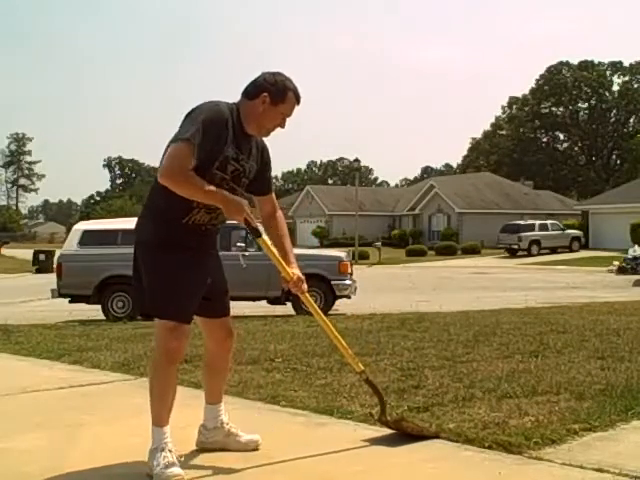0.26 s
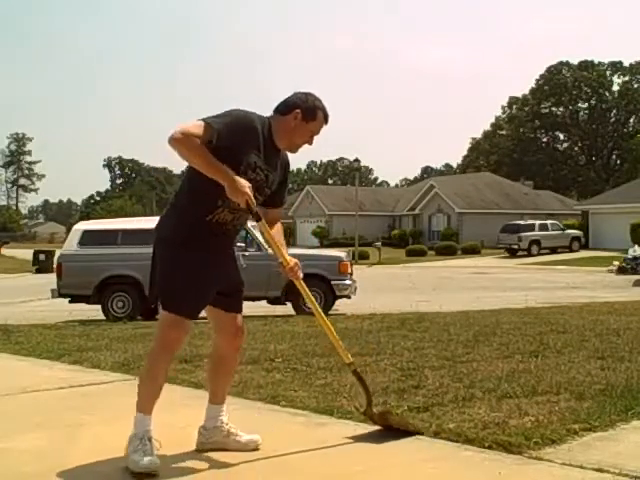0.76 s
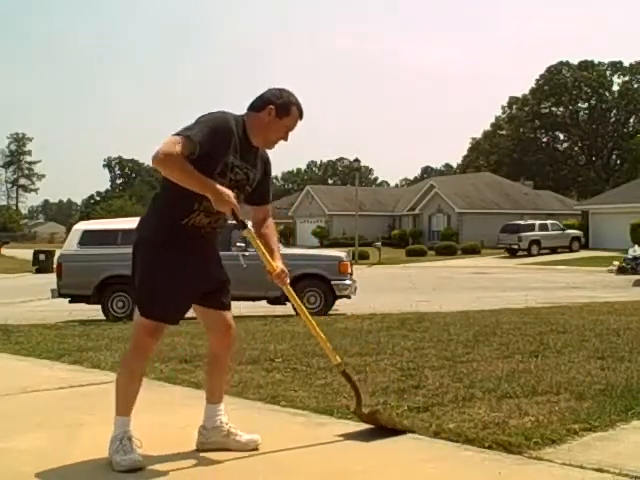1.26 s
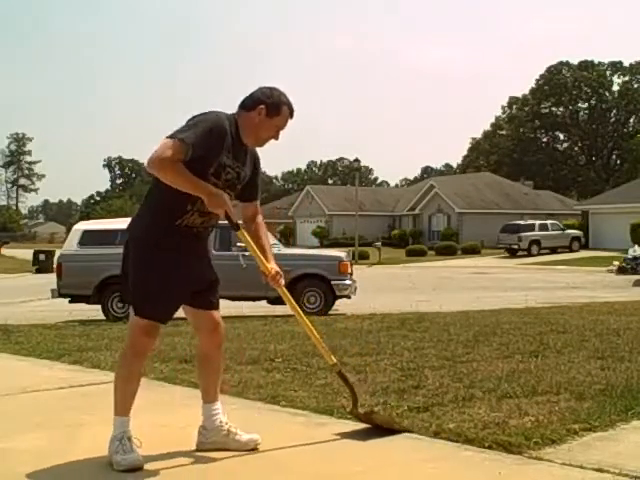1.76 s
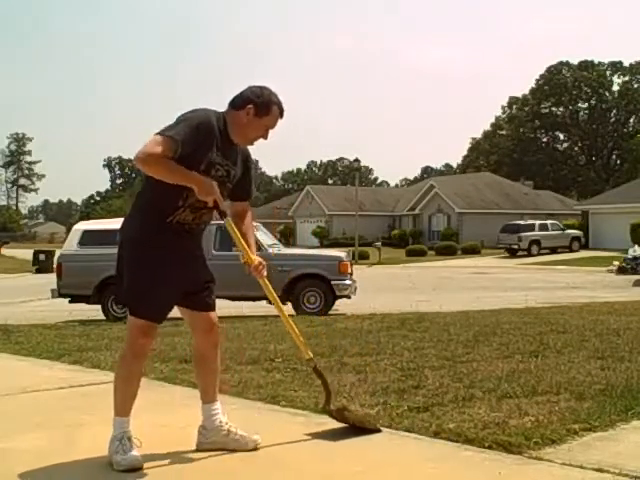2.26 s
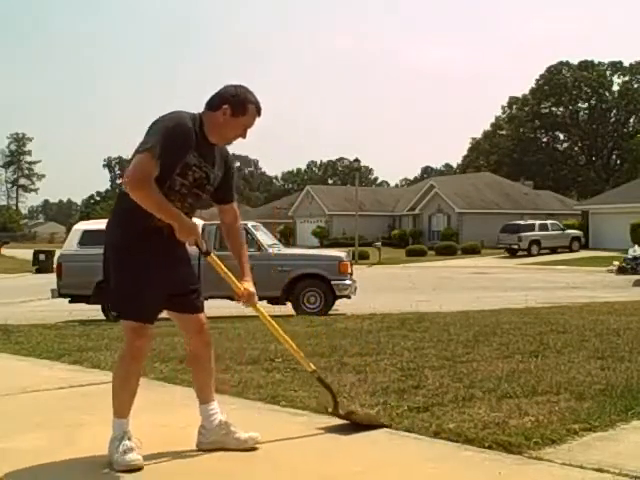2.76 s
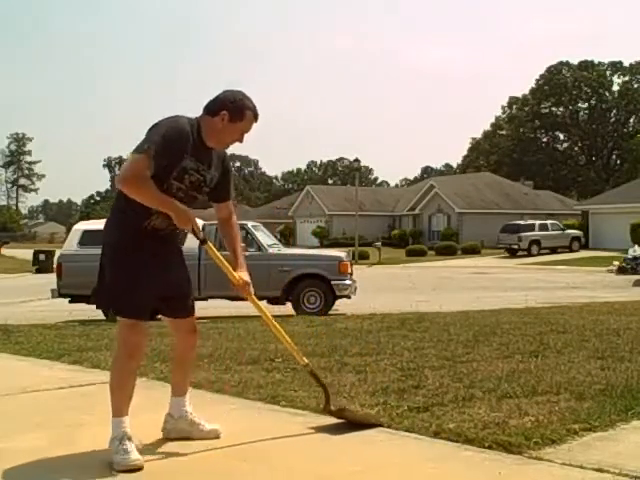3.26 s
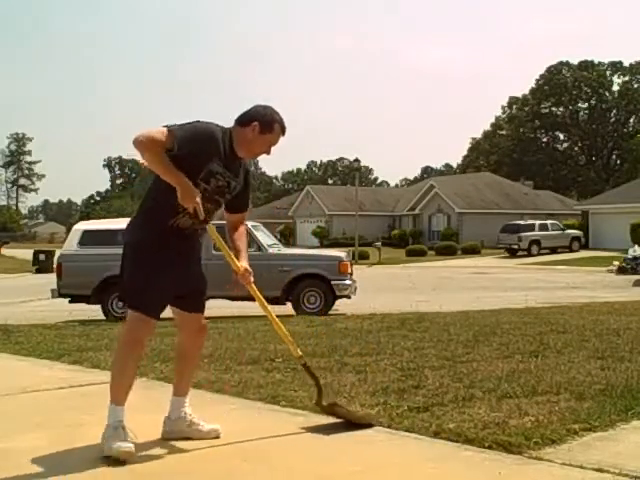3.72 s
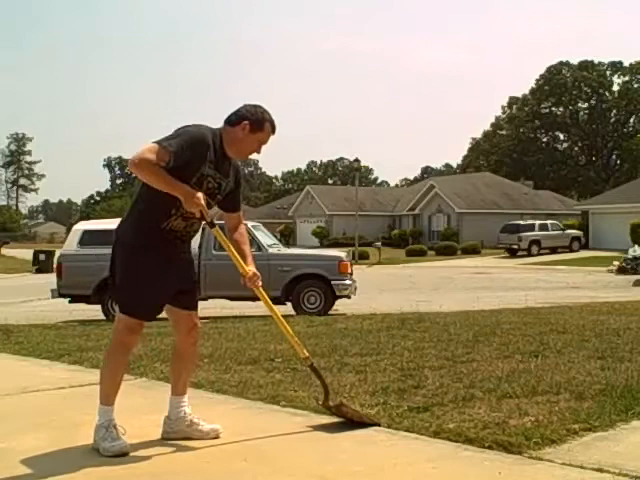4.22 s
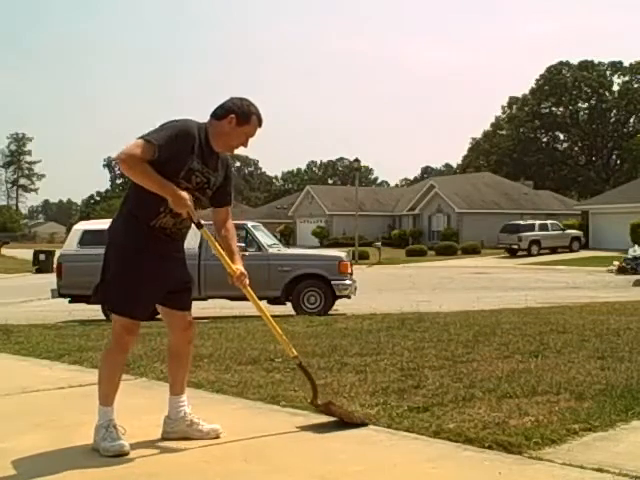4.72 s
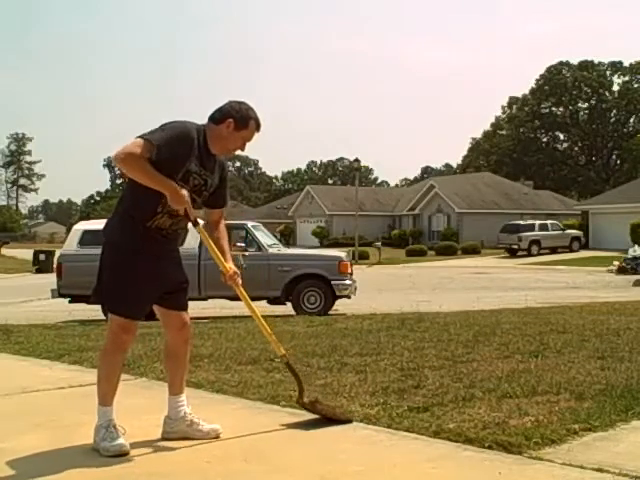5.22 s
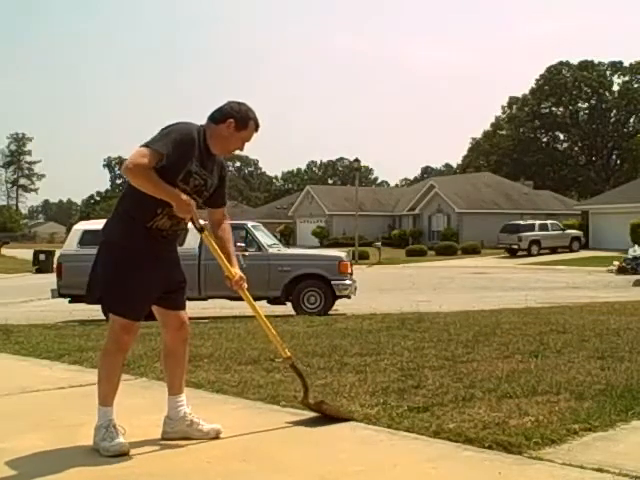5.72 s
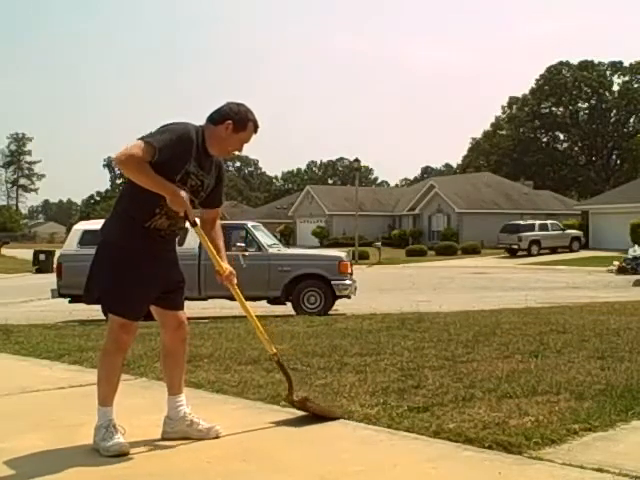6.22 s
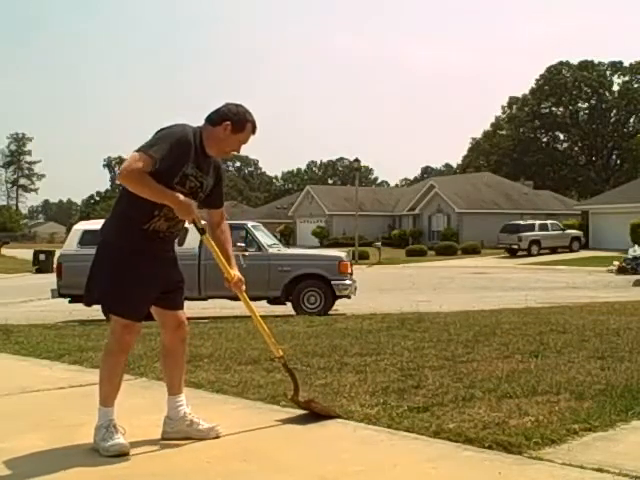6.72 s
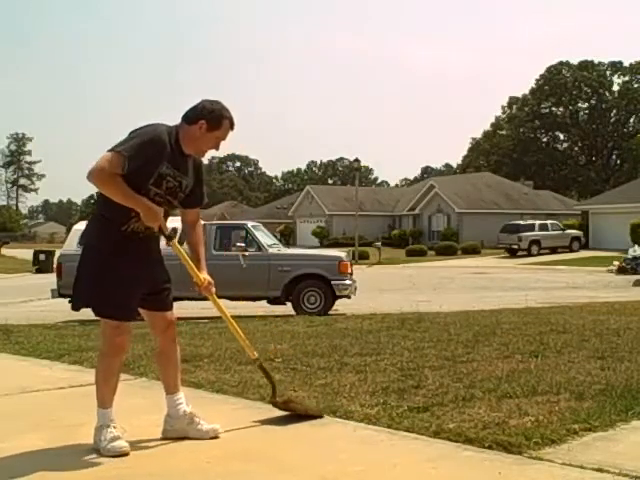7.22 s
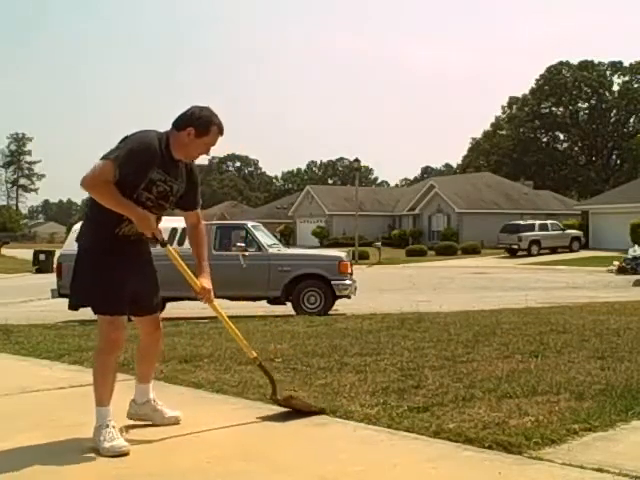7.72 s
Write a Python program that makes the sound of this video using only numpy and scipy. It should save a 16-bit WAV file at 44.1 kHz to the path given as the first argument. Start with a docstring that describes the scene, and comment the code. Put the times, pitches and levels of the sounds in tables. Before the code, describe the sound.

Rapid short shovel scrapes along a driveway edge, crunching sand and dully ringing metal, echo softly across a quiet, slightly breezy suburban yard.

```python
"""Throughout, a far machine hums as wavering sines; distant air and light wind are shaped noise.
From the start a steel shovel is set down on a concrete drive and pushed along the lawn's edge, about
three strokes a second: sand hisses and crackles as bursts of grains in bands, the blade rings dully as
damped modes, and house fronts throw it back as a decaying noise wash.
The strongest gust peaks near 3.8 s, the hardest bite falls near 7.6 s."""
import sys
import numpy as np
from scipy import signal
from scipy.fft import rfft, irfft, next_fast_len
from scipy.io import wavfile

SR = 44100
rng = np.random.default_rng(int(sys.argv[2]) if len(sys.argv) > 2 else 0)


def unload_wav(signal):
    """Save mono or channel-first audio to the path in sys.argv[1] as 16-bit WAV at rate SR, clipped to [-1, 1]."""
    wavfile.write(
        sys.argv[1],
        SR,
        np.round(np.clip(np.atleast_2d(signal).T, -1, 1) * 32767).astype(np.int16),
    )


N = 351918

# Far machine. Each row: frequency in Hz, spread of its wander in Hz, mean level in dB.
HUM_TONES = [(57.8, 5.77, -62.5), (116.8, 1.53, -58), (169, 4.15, -68.5), (231.5, 1.4, -60.5)]
# Distant air spectrum. Each row: frequency in Hz, relative level per Hz in dB.
AIR_SPECTRUM = [(20, -2), (60, -4.5), (150, -4), (330, -15.5), (1000, -26), (4000, -19.5), (10000, -33),
                (16000, -32)]
AIR_DB = -52.5
# Gusts on the microphone. Each row: time of peak in seconds, peak level in dB.
WIND_GUSTS = [(0.13, -53), (3.36, -50), (3.6, -48), (3.82, -42.5), (4.04, -45), (4.73, -56), (5.02, -47),
              (5.76, -50), (6.07, -54), (7.6, -47)]
BREEZE_DB, GUST_DB_PER_S = -63, 110  # floor between gusts; slope of rise and fall

# Touches of blade on concrete. Each row: start, turning point and end in seconds, grit drive there in dB
# (three columns), then blade ring, blade body and fine dust over grit in dB, for a firm touch.
TOUCHES = [ (0.0, 0.024, 0.043, -44, -49, -58, -1.5, -11, -16),
           (0.056, 0.09, 0.12, -49, -41, -54, 8, -2.5, -7),
           (0.123, 0.125, 0.18, -20, -23.5, -33.5, 4.5, -4.5, -21),
           (0.337, 0.346, 0.38, -31, -36, -43, 5, 2, -21),
           (0.378, 0.424, 0.46, -44, -23, -37.5, 1.5, -7.5, -14),
           (0.621, 0.652, 0.68, -40, -28, -43, 4, -5, -10),
           (0.693, 0.791, 0.88, -23, -19, -28.5, 2.5, -8, -6.5),
           (0.863, 0.953, 0.98, -25, -14, -32.5, 2, -2.5, -0.5),
           (1.2, 1.221, 1.25, -41, -27, -46, 3.5, -14, -6),
           (1.264, 1.27, 1.325, -22, -21, -34.5, 1, -13, 1.5),
           (1.311, 1.379, 1.376, -29, -21.5, -40, -1, -7, 2),
           (1.532, 1.584, 1.646, -48, -31.5, -39.5, 2, -5, -16),
           (1.621, 1.622, 1.655, -24, -23, -38, -3.5, -13, 7),
           (1.659, 1.709, 1.744, -29, -24, -39.5, -2.5, -5, -6),
           (1.871, 1.905, 1.964, -52, -30.5, -39, 6, 2, -26),
           (1.942, 1.952, 1.96, -35, -28, -38, -4, -6.5, -4),
           (2.143, 2.178, 2.218, -53, -30, -56, 7.5, -3.5, -25),
           (2.252, 2.278, 2.321, -23.5, -16.5, -24.5, 2.5, -9.5, -1.5),
           (2.322, 2.333, 2.4, -25, -22, -42, 2, -8, 1.5),
           (2.416, 2.419, 2.47, -27, -33.5, -49, -11, -23, 4),
           (2.468, 2.472, 2.504, -33, -27.5, -42.5, -13, -26, 5),
           (2.616, 2.619, 2.65, -47, -46.5, -59, -20, -40, 9),
           (2.669, 2.719, 2.804, -50.5, -28.5, -28.5, 4, -9.5, -5),
           (2.799, 2.895, 2.94, -29.5, -18.5, -40, -0.5, -8, -0.5),
           (3.176, 3.184, 3.222, -24, -26, -46, 2, -9, 0.5),
           (3.226, 3.246, 3.323, -27, -22.5, -43.5, -3.5, -7.5, -1.5),
           (3.501, 3.518, 3.53, -39, -34, -43, -2, -11, -6), (3.53, 3.622, 3.64, -47, -26, -34, 3, -9, -7),
           (3.842, 3.851, 3.895, -24.5, -25.5, -39, 2.5, -6, -8),
           (3.89, 3.92, 3.95, -42, -37, -38, -1, -8, 4),
           (3.93, 3.975, 4.027, -31.5, -23, -44.5, 3, -7, 1.5),
           (4.26, 4.292, 4.325, -36, -37.5, -50, 5.5, 1, -8),
           (4.325, 4.382, 4.397, -48.5, -23, -41.5, -2, -7.5, -6),
           (4.591, 4.618, 4.648, -40, -28.5, -32, 3.5, -5.5, 2.5),
           (4.65, 4.691, 4.724, -31, -23, -38, 2.5, -7, -3),
           (4.916, 4.924, 4.974, -30, -26, -49, 3.5, -6.5, -9),
           (4.98, 5.008, 5.1, -22.5, -18, -31.5, -5, -10.5, -0.5),
           (5.071, 5.128, 5.16, -30.5, -18.5, -28, 1.5, -8.5, 0.5),
           (5.35, 5.36, 5.407, -33, -31.5, -48, 3.5, -4.5, -15),
           (5.41, 5.415, 5.45, -27, -22, -34, 1.5, -8, 1), (5.44, 5.483, 5.52, -34, -19, -31, 0, -7, -2.5),
           (5.66, 5.698, 5.75, -51, -30.5, -55, 1, -3, -8),
           (5.745, 5.752, 5.771, -21.5, -23.5, -29, 0.5, -5.5, -1),
           (5.769, 5.812, 5.852, -35, -16, -29, 0, -6, -0.5),
           (6.038, 6.056, 6.05, -34, -28, -54, -0.5, -11, -21),
           (6.079, 6.092, 6.13, -23.5, -22, -28.5, 1.5, -11, 3.5),
           (6.12, 6.14, 6.183, -32, -20.5, -29, -3, -11.5, -2.5),
           (6.369, 6.398, 6.51, -44.5, -32, -30.5, 2.5, -10.5, -4),
           (6.43, 6.509, 6.529, -34, -23, -35, -3.5, -5.5, -3),
           (6.688, 6.696, 6.7, -34.5, -35.5, -55, 5, 2.5, -10),
           (6.726, 6.76, 6.81, -29.5, -31.5, -39, 3, -5, 3.5),
           (6.802, 6.817, 6.85, -49, -25.5, -33.5, 1, -6, 0),
           (7.032, 7.039, 7.07, -31, -32, -47, 2.5, -4.5, -3),
           (7.061, 7.078, 7.105, -39, -30, -50, 4, -6, -10),
           (7.115, 7.12, 7.17, -27, -24.5, -35, -1, -13, -7),
           (7.357, 7.397, 7.41, -34.5, -29.5, -50, 1.5, -13.5, -16),
           (7.435, 7.491, 7.575, -22.5, -18, -31, -0.5, -13.5, -0.5),
           (7.577, 7.627, 7.648, -29, -18, -22, 1, -6, 1), (7.648, 7.662, 7.686, -22, -15, -22, -1, -10, 1),
           (7.945, 7.978, 8.06, -57.5, -24.5, -26, -3, -4, -5)]
FIRM_DB = -28.5  # grit drive of a firm touch; lighter ones crush less sand, so the steel stands out
RING_DB_PER_DB, BODY_DB_PER_DB, DUST_DB_PER_DB = -0.15, -0.37, 0.07  # per dB of grit over a firm touch
# Edge bites on a stone or ridge. Each row: time in seconds, relative strength in dB,
# steel (ring and body alike) over strength in dB, fine dust over strength in dB.
EDGE_BITES = [(0.0624, -37, 10.5, -11), (0.1234, -7, -5, -26), (0.3391, -17, -3, -19),
              (0.3584, -10.5, -13, -12.5), (0.388, -14, -23, -13), (0.411, -14, -4, -27),
              (0.6217, -21, 3, -9), (0.6356, -12.5, -3, -22), (0.6955, -18, -6, -19),
              (0.7025, -18, -16, -14), (0.886, -14, -14, -12), (1.2026, -15, 1, -23), (1.263, -8, -21, -12),
              (1.3144, -18, -16, -22), (1.3418, -13.5, 0, -14), (1.5347, -48, 6, -18),
              (1.5923, -19, -13, -10), (1.6193, -15, -18, -14), (1.8733, -42, 12, -19),
              (1.907, -20, 2, -29), (2.145, -45, 12, -14), (2.163, -25, 5.5, -28), (2.2545, -12, -15, -13),
              (2.359, -14.5, -21, -13), (2.418, -22, -23, -7), (2.4667, -25, -27, -2),
              (2.6179, -33, -18, -4), (2.639, -31.5, -8, -16), (2.694, -31, 0, -8), (2.706, -20, -5, -8),
              (2.7738, -16.5, -2.5, -11), (2.809, -23, -2, -11), (2.855, -11, -3, -8), (3.18, -12, -7, -10),
              (3.2255, -18, -18, -12), (3.2475, -9.5, -16, -14), (3.5054, -21, -4.5, -15),
              (3.538, -24, -16, -3), (3.553, -13.5, -30, -7), (3.6011, -15, -4, -14),
              (3.8446, -12.5, -9.5, -9), (3.8647, -12, -11, -14), (3.905, -26, -14, -8),
              (3.933, -27, -25, -5), (4.0853, -22, -20, -11), (4.2594, -24, 7, -15),
              (4.3003, -15, -15, -12), (4.355, -23, -14, -10), (4.5928, -23, 0.5, -19),
              (4.6156, -20, -22, -7), (4.6618, -23.5, 3, -7), (4.682, -17, -14, -17),
              (4.9203, -16, -9, -19), (4.978, -18, -14, -13), (5.025, -6, -17, -10),
              (5.0759, -22, -11, -12), (5.353, -18, -0.5, -28), (5.415, -8, -6, -12),
              (5.6647, -32, -1, -10), (5.683, -15.5, 1.5, -18), (5.7533, -18, -11, -10),
              (5.7872, -13, -17, -14), (5.8112, -9, -17, -16), (6.041, -25, -9, -22), (6.079, -23, -7, -12),
              (6.134, -21, -11, -16), (6.372, -33, -8, -14), (6.3942, -23, -5, -13), (6.436, -16, -24, -11),
              (6.6887, -29, 4, -14), (6.7266, -29, -14, -13), (6.788, -19, -13, -7), (6.8092, -12, -12, -7),
              (7.0342, -21, -10, -19), (7.0755, -18, -6, -17), (7.1153, -14, -14, -21),
              (7.359, -32, -3, -21), (7.384, -20, -8, -19), (7.441, -9, -18, -7), (7.4815, -10.5, -12, -17),
              (7.58, -5, -20, -8), (7.6019, -1, -7, -7), (7.655, -10, -14, -14), (7.6765, -10, -12, -16),
              (7.9623, -25, -12, -19)]
# One row: offset added to every bite for grit, ring, body and dust, in dB.
BITE_OFFSETS_DB = -13.5, -9.5, -21, -1
BITE_T60_S, KNOCK_DECAY_S = 0.04, 0.00032
# Crushed sand spectrum. Each row: frequency in Hz, relative level per Hz in dB.
GRIT_SPECTRUM = [(300, -13.5), (700, -10.5), (1300, -14.5), (2300, -9), (3600, -10.5), (6000, -10.5),
                 (9400, -7.5), (13000, -13), (16000, -25.5)]
# Blade modes; low ones bend the whole pan, high ones only its thin edge.
# Each row: frequency in Hz, width in Hz, relative level in dB.
BLADE_MODES = [(255, 47, -12), (330.6, 114, -18), (438.6, 32.5, -9.5), (687.5, 29.7, -2), (876.6, 40, -7),
               (986, 51, -5), (1209, 54, -5.5), (1324, 49, -5), (1434, 32, -5.5), (1520, 14, -7),
               (1612, 21, -5), (1753, 42, 0), (1846, 49, -4), (1942, 37, 1), (2028, 36, 3), (2148, 67, -3),
               (2372, 60, -6), (2441, 46, -4), (2743, 83, -2.5), (2870, 50, -2.5), (3005, 93, -6),
               (3145, 32, -5.5), (3840, 140, 0), (4777, 73, 5), (5970, 290, -7), (6180, 180, -2),
               (6730, 550, -3.5), (7820, 330, -2), (8470, 170, 3.5), (9400, 360, -4)]
RING_FROM_HZ, RING_TO_HZ = 1350, 3400  # pan modes below, edge modes above
BLOW_OVER_SAND_RMS, TAP_DB = 3.22, 4  # blow at each bite; its click heard straight

# Echoes. Each row: band centre in Hz, T60 in seconds, relative level in dB.
YARD_BANDS = [(246, 0.38, -6), (680, 0.53, -2.5), (1980, 0.26, -14.5), (4740, 0.41, -7.5),
              (13000, 0.22, -18)]
TOP_HZ = 16000


def undb(db):
    """Gain of a level in dB."""
    return 10 ** (np.asarray(db) / 20)


def unit(x):
    """Scaled to rms 1."""
    return x / np.sqrt(np.mean(x ** 2))


def walk(rate_hz):
    """Random levels, rate_hz a second, joined by straight lines; spread near 1."""
    count = int(N / SR * rate_hz) + 2
    levels = rng.standard_normal(count)
    return 1.185 * np.interp(np.arange(N) * rate_hz / SR, np.arange(count), levels)


def colour(x, points):
    """Shapes the spectrum by (Hz, dB) points, straight over log frequency."""
    hz, db = np.transpose(points)
    size = next_fast_len(len(x))
    f = np.maximum(np.fft.rfftfreq(size, 1 / SR), 1)
    gain = undb(np.interp(np.log(f), np.log(hz), db))
    return irfft(rfft(x, size) * gain, size)[:len(x)]


def resonance(x, hz, width_hz):
    """One damped mode, gain 1 at its centre."""
    return signal.lfilter(*signal.iirpeak(hz, hz / width_hz, SR), x)


def machine_hum():
    """Sines wavering in pitch and level."""
    hum = 0
    for hz, wander_hz, db in HUM_TONES:
        phase = 2 * np.pi * np.cumsum(hz + wander_hz * walk(6)) / SR
        hum = hum + undb(db) * unit(np.sin(phase)) * undb(2.0 * walk(6.4))
    return hum


def distant_air():
    """Coloured noise, drifting in level."""
    level = undb(AIR_DB + 2.2 * walk(3.23))
    return level * unit(colour(rng.standard_normal(N), AIR_SPECTRUM))


def wind():
    """Low noise buffeting the microphone: a breeze, and gusts even in dB per second up and down."""
    rumble = unit(colour(rng.standard_normal(N), [(14, -20), (25, -5), (50, -5), (90, -15), (300, -61)]))
    s, peak_db = np.transpose(WIND_GUSTS)[:, :, None]
    gusts_db = peak_db - GUST_DB_PER_S * abs(np.arange(N) / SR - s)
    return rumble * undb(np.maximum(BREEZE_DB, gusts_db.max(axis=0)))


def suburb():
    """Background: hum, air and wind add up."""
    return machine_hum() + distant_air() + wind()


def pressure():
    """Blade pressure drives grit, ring, body and dust: touches, plus a fast dying burst at each bite."""
    t, drive = np.arange(N) / SR, np.zeros((4, N))
    lean = np.array([[0], [RING_DB_PER_DB], [BODY_DB_PER_DB], [DUST_DB_PER_DB]])
    for start, turn, end, start_db, turn_db, end_db, ring_db, body_db, dust_db in TOUCHES:
        touch = slice(int(start * SR), int(end * SR))
        times = [start, np.clip(turn, start, end), end]
        grit_db = np.interp(t[touch], times, [start_db, turn_db, end_db])
        share_db = np.array([[0], [ring_db], [body_db], [dust_db]])
        drive[:, touch] += undb(grit_db + share_db + lean * (grit_db - FIRM_DB))
    drive = signal.lfilter([.04], [1, .04 - 1], drive)  # rounds the corners
    # the first blow knocks the steel harder than the sand
    knock = np.array([[.4], [3.0], [3.0], [.4]])
    for s, bite_db, steel_db, dust_db in EDGE_BITES:
        first = int(s * SR)
        span = slice(first, first + SR // 5)
        after_s = t[span] - s
        burst = np.exp(-np.log(1000) * after_s / BITE_T60_S) + knock * np.exp(-after_s / KNOCK_DECAY_S)
        gain = undb(bite_db + np.array(BITE_OFFSETS_DB) + np.array([0, steel_db, steel_db, dust_db]))
        drive[:, span] += gain[:, None] * burst
    # the concrete is rough in patches
    return drive * undb(1.82 * walk(150))


def sand(spread_db, smear):
    """Dense grains breaking, some far louder than the rest; each crumbles over a few samples."""
    sizes = undb(spread_db * np.minimum(rng.exponential(size=N), 7))
    power = signal.lfilter([1], [1, -smear], sizes ** 2)
    return unit(rng.standard_normal(N) * power ** .5)


def crackle(grit, body, dust):
    """Grains of each size click at their own pitch and their own moments."""
    hz, db = np.transpose(GRIT_SPECTRUM)
    out = 0
    for centre_hz in 300 * 1.55 ** np.arange(10):
        drive = dust if centre_hz > 9000 else grit if centre_hz > 1300 else body
        level_db = np.interp(np.log(centre_hz), np.log(hz), db)
        grains = sand(2.33, 0.89) * undb(level_db + 1.74 * walk(30))
        # bigger grains snap, about 120 a second in each band
        snaps = (rng.random(N) < 120 / SR) * 1.
        grains = grains * (1 + signal.lfilter([1.6], [1, -.96], snaps))
        out = out + resonance(drive * grains, centre_hz, 0.43 * centre_hz)
    return out


def blade(force, modes, wander_db):
    """The edge touches at ever new places, so each mode is struck now harder, now softer."""
    power, out = 0, 0
    for k, (hz, width_hz, db) in enumerate(modes):
        power += undb(2 * db) * np.pi * width_hz / SR
        struck = force * undb(db + wander_db * walk(16))
        out = out + (-1) ** k * resonance(struck, hz, width_hz)  # alternate signs
    return out / np.sqrt(power)


def shovel():
    """Crushed grit heard straight and through the steel."""
    grit, ring, body, dust = pressure()
    blows = np.zeros(N)
    bite_s = np.array(EDGE_BITES)[:, 0]
    blows[(bite_s * SR).astype(int) + 1] = BLOW_OVER_SAND_RMS  # one clean blow starts each bite
    force = sand(3.07, 0.69) + blows
    pan_modes = [m for m in BLADE_MODES if m[0] < RING_FROM_HZ]
    ring_modes = [m for m in BLADE_MODES if RING_FROM_HZ <= m[0] < RING_TO_HZ]
    edge_modes = [m for m in BLADE_MODES if m[0] >= RING_TO_HZ]
    pan = undb(-4.5) * blade(force * body, pan_modes, 2.87)
    middle = undb(-4.5) * blade(force * ring, ring_modes, 3.46)
    edge = undb(-11.0) * blade(force * grit, edge_modes, 3.1)
    tap = undb(TAP_DB) * resonance(blows * ring, 1880, 2100)
    return undb(8) * crackle(grit, body, dust) + pan + middle + edge + tap


def yard(dry):
    """House fronts and cars scatter it back: a short gap, then a wash dying band by band.
    As the blade moves along the edge, the echo paths keep changing."""
    t = np.arange(SR * 3 // 4) / SR
    turn = 2 * np.pi * 4.0 * np.arange(N) / SR
    onset = np.clip((t - .006) / 0.0097, 0, 1)
    wash = 0
    for path in range(3):
        echo = 0
        for hz, t60_s, db in YARD_BANDS:
            band = resonance(rng.standard_normal(len(t)), hz, hz)
            decay = np.exp(-np.log(1000) * t / t60_s)
            echo = echo + undb(db) * band * decay / np.sqrt(t60_s * SR / 14)
        share = np.sqrt(2 / 3) * np.cos(turn + path * np.pi / 3)  # squares sum to 1 over the paths
        wash = wash + signal.fftconvolve(dry * share, echo * onset)[:N]
    return wash


def scene():
    """One microphone a few metres off."""
    near = shovel()
    return (near + yard(near) + suburb())[None]


def record(dry):
    """A quick gain control turns loud scrapes down a little; two low-passes cut the top."""
    loud = np.sqrt(signal.lfilter([.001], [1, .001 - 1], dry ** 2))
    held = dry * np.minimum(1, undb(-25) / (loud + 1e-9)) ** 0.11
    held = signal.sosfilt(signal.ellip(10, .2, 32, TOP_HZ, fs=SR, output="sos"), held)
    return signal.sosfilt(signal.ellip(12, .2, 60, 16950, fs=SR, output="sos"), held)


dry = scene()
out = record(dry)
unload_wav(out)
```